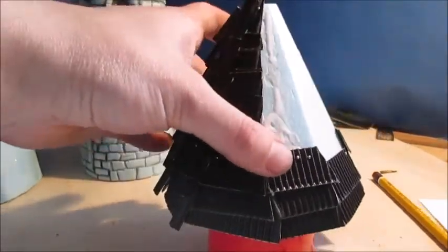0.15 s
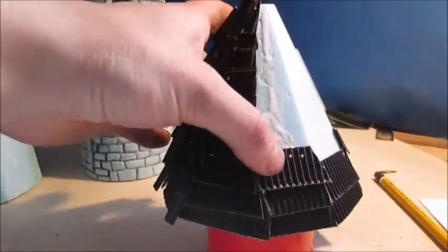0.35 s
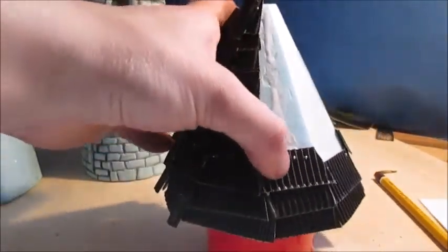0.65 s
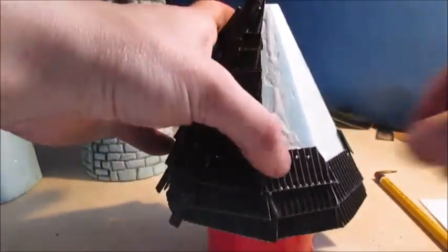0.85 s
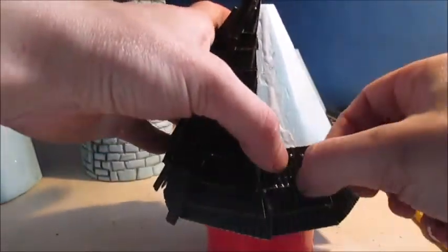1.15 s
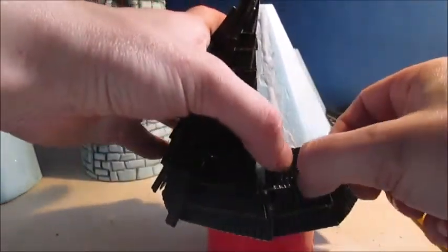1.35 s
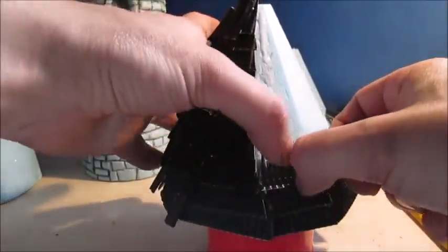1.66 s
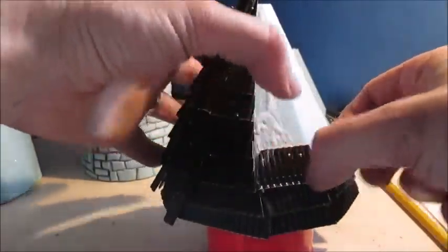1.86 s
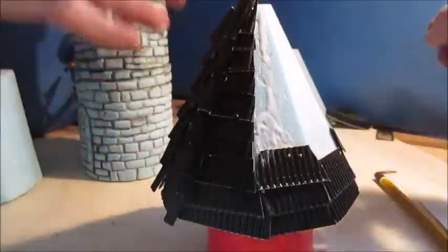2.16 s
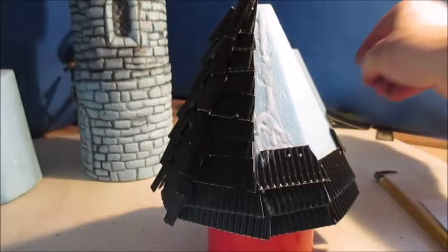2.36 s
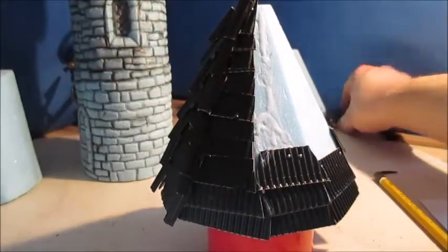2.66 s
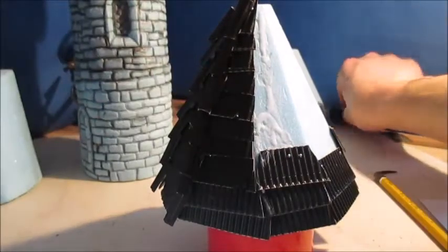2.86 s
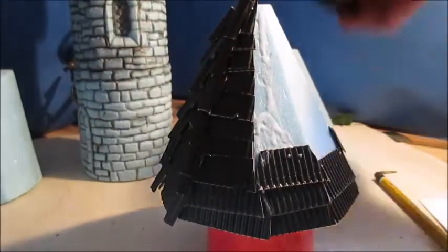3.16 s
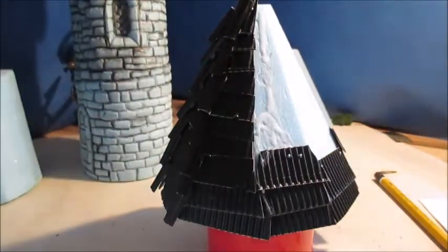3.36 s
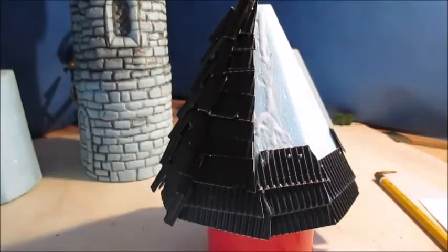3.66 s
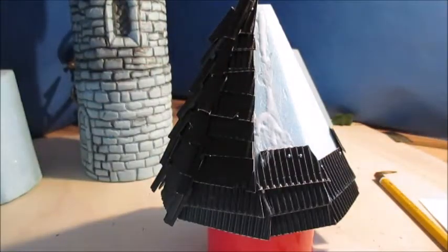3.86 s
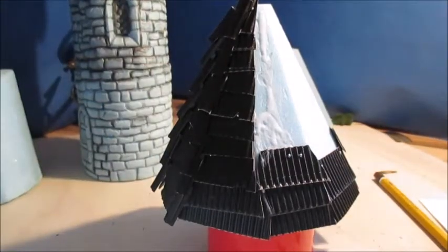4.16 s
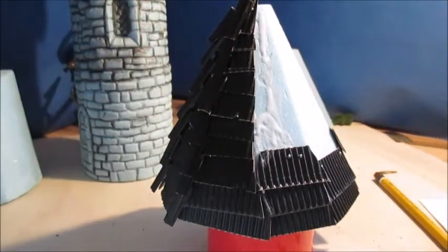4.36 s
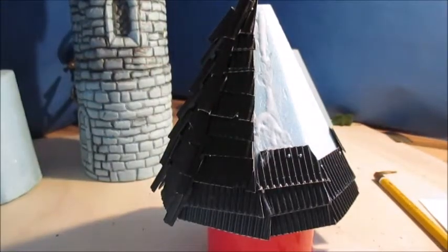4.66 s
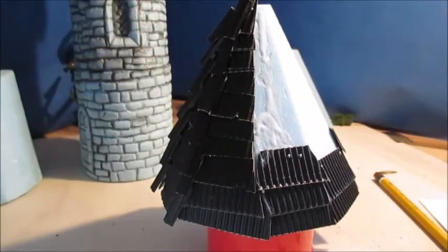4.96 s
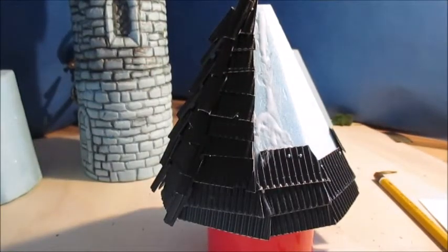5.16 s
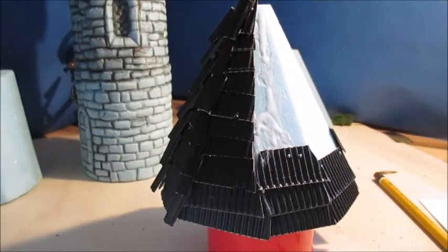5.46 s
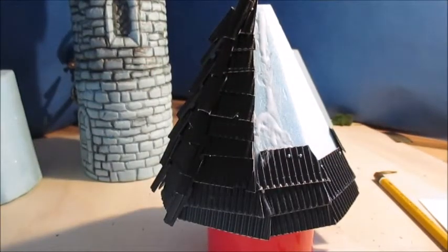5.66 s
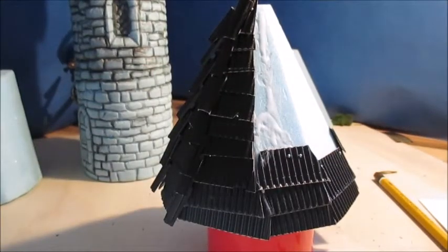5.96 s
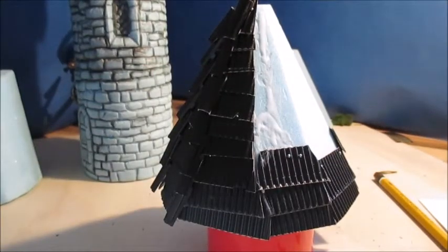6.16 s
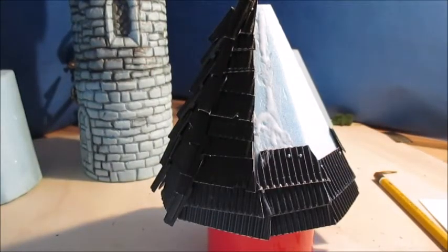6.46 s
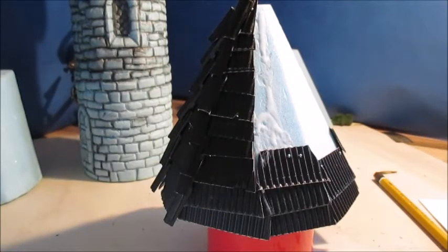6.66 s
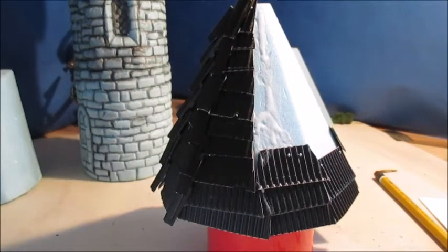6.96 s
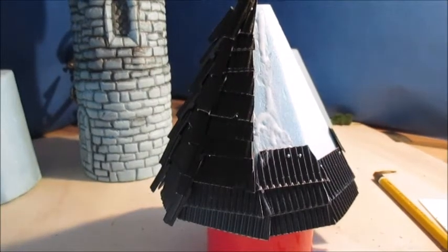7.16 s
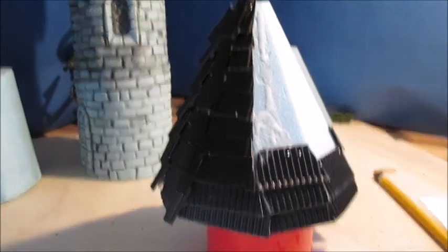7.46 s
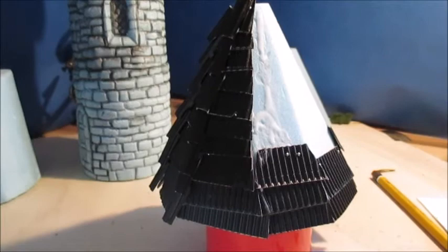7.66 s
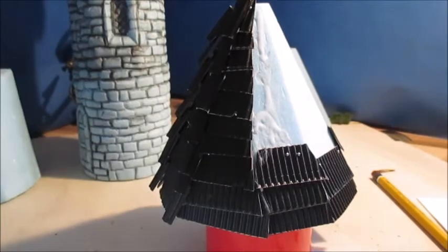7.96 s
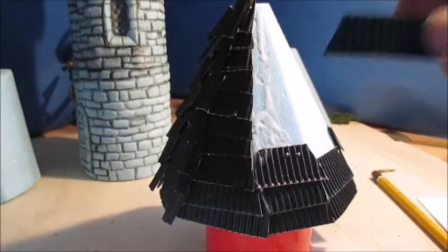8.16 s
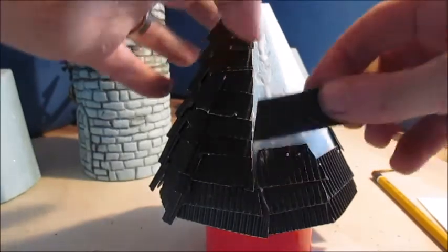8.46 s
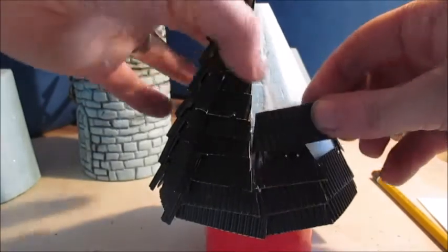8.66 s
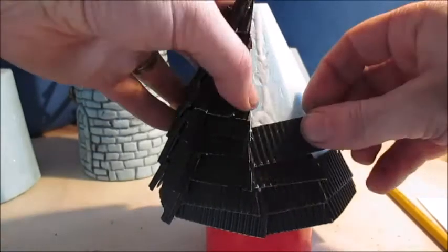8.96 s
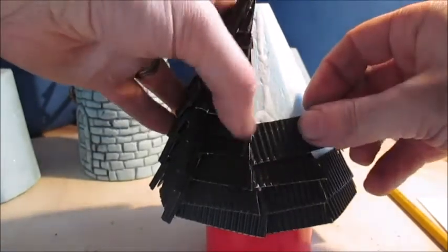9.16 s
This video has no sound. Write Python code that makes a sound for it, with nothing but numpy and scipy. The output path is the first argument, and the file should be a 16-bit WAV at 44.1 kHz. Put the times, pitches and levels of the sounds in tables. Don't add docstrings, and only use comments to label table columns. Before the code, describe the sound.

A small room with low mains hum and soft fan noise throughout, miked close to hands handling ribbed card and foam on a wooden table. From 0 to 1.1 s, taps and short drags, with firm dull knocks around 0.7 s and soft table thuds. Small, faint handling follows until one sharp, cracking low knock at 1.6 s, then near quiet. At 2.5-2.9 s a bout of gritty rubbing and quick knocks. Light brushes and ticks at 3.2-3.7 s, then a hard knock at 4.05 s with scraping to about 5 s. Soft brushing and sparse scuffs until 6.1 s, where a bright snap sounds; crisp snaps cluster at 6.45-6.53 s. Knocking and rubbing at 7.0-7.3 s lead to the loudest clack at 7.45 s with a short room tail. Small bright ticks at 7.9 s, then faint touches and a weak drag from 8.2 to 9.2 s.

```python
import sys
import numpy as np
from scipy import signal
from scipy.fft import rfft, irfft
from scipy.io import wavfile
from scipy.ndimage import uniform_filter1d

SR = 44100
rng = np.random.default_rng(int(sys.argv[2]) if len(sys.argv) > 2 else 0)


def master(y):
    cut = np.clip(np.atleast_2d(y).T, -1, 1)
    pcm = np.round(cut * 32767)
    wavfile.write(sys.argv[1], SR, pcm.astype(np.int16))


def voltage_ratio(decibels):
    exponent = np.asarray(decibels, float) / 20
    return 10 ** exponent


N = 410571


def rms_one(x):
    return x / np.sqrt(np.mean(x ** 2) + 1e-20)


def at_hz(points, hz):
    hz_points, values = np.transpose(points)
    return np.interp(np.log(np.maximum(hz, 1)), np.log(hz_points), values)


def coloured(x, spectrum):
    gain = voltage_ratio(at_hz(spectrum, np.fft.rfftfreq(N, 1 / SR)))
    return rms_one(irfft(rfft(x) * gain, N))


def band(x, low_hz, high_hz):
    return signal.sosfilt(signal.butter(2, [low_hz, high_hz], "band", fs=SR, output="sos"), x)


def drift(rate_hz):
    r = np.exp(-2 * np.pi * rate_hz / SR)
    noise = rng.standard_normal(N + SR)
    return rms_one(signal.lfilter([1], [1, -2 * r, r * r], noise)[SR:])


def contacts(rows, spread, rise, slips_per_s, first_db, cycles):
    ladder, rise = np.linspace(-2, 2, num=30), np.clip(rise, 1e-4, .03)
    out = np.zeros(N + SR)
    for s, peak_db, centre_hz, t60 in rows:
        chance, luck = rng.standard_normal((2, 30)), rng.random((2, SR // 4))
        step = ladder + .025 * chance[0]
        hz = np.minimum(centre_hz * 2 ** (spread * step), .4 * SR)
        weight = np.exp(-step ** 2 / 2.0) * hz ** 0.53 * voltage_ratio(2.4 * chance[1])
        ring_samples = min(1500, int(cycles / hz.min() * SR))
        turns = np.outer(hz, np.arange(ring_samples) / SR)
        rings = np.sin(2 * np.pi * turns) * np.exp(-np.log(1000) / cycles * turns)
        body = np.pad(weight @ rings, (0, 300))

        t60 = np.clip(t60, .004, .3)
        t = np.arange(min(SR // 4, int((rise + 1.2 * t60) * SR))) / SR
        force = np.minimum(t / rise, 1) * voltage_ratio(-60 * np.maximum(t - rise, 0) / t60)
        slips = ((luck[0] < slips_per_s / SR) * (2 * luck[1] - 1))[:len(t)]
        slips[round(rise * SR)] = voltage_ratio(first_db) * np.exp(-rise / 0.0044)
        sound = signal.fftconvolve(slips * force, body)
        sound = band(sound, hz.min(), hz.max())
        at = round(s * SR)
        out[at:at + len(sound)] += voltage_ratio(peak_db + 2.0) * sound / np.abs(sound).max()
    return out[:N]


# start in seconds, peak level in dB, middle pitch in Hz, time to fall 60 dB in seconds.
FIRM_KNOCKS = [(.376, -16.5, 860, 0.082), (.711, -8.5, 970, 0.11), (.817, -27, 900, .04),
               (1.278, -41, 1110, 0.33), (1.58, -35, 786, .016), (2.637, -26, 650, .032),
               (2.797, -16.5, 1230, .047), (2.828, -19, 520, 0.029), (4.033, -13.5, 750, 0.14),
               (4.085, -13.5, 600, 0.035), (4.38, -17, 1730, 0.057), (4.438, -18, 1010, 0.057),
               (6.443, -13, 2440, 0.0078), (6.503, -22, 2000, 0.008), (6.528, -15, 1300, 0.018),
               (7.212, -26, 840, 0.03), (8.222, -37, 755, 0.024), (7.022, -10, 1100, 0.035)]


def firm_knocks():
    return contacts(FIRM_KNOCKS, spread=0.75, rise=0.001226, slips_per_s=2500, first_db=5.5, cycles=14)


# start in seconds, peak level in dB, middle pitch in Hz, time to fall 60 dB in seconds.
HOLLOW_KNOCKS = [
    (.091, -16.5, 1340, 0.037),
    (.415, -21, 570, 0.031),
    (.775, -33, 804, .059),
    (1.59, -8.5, 627, 0.015),
    (6.462, -27, 1380, 0.028),
    (7.442, -1.5, 1360, 0.019),
    (7.476, -8, 1300, 0.03),
    (8.664, -44, 2280, .013),
    (7.463, 2.3, 820, 0.026),
]


def hollow_knocks():
    return contacts(HOLLOW_KNOCKS, spread=0.37, rise=.0014, slips_per_s=2500, first_db=5.5, cycles=14)


# start in seconds, peak level in dB, middle pitch in Hz, time to fall 60 dB in seconds.
GLANCING_KNOCKS = [(.172, -37, 1390, .026), (.33, -25.5, 690, .036), (.619, -23, 960, 0.038),
                   (.749, -10, 950, 0.03), (.903, -31.5, 1110, 0.036), (1.012, -35, 700, 0.12),
                   (2.545, -16, 1230, 0.04), (2.62, -30, 910, 0.029), (2.652, -22, 1100, 0.035),
                   (2.727, -14, 1110, 0.04), (2.765, -18, 1470, 0.095), (3.501, -29.5, 1660, 0.014),
                   (3.72, -29, 1830, 0.0088), (4.063, -2, 1480, 0.025), (4.46, -18, 850, 0.017),
                   (.115, -32.5, 1240, 0.11), (7.055, -19, 1150, 0.064), (7.307, -27, 1380, 0.01),
                   (7.495, -12, 1410, 0.034), (7.876, -29.5, 1290, 0.0056), (8.866, -43, 1250, 0.037)]


def glancing_knocks():
    return contacts(GLANCING_KNOCKS, spread=0.73, rise=0.0053, slips_per_s=2500, first_db=5.5, cycles=14)


# start in seconds, peak level in dB, middle pitch in Hz, time to fall 60 dB in seconds.
SHOVES = [
    (.305, -25.5, 1080, 0.11),
    (.392, -19, 900, 0.03),
    (.742, -23, 1090, 0.048),
    (2.587, -20, 930, 0.058),
    (4.248, -24.5, 1140, 0.13),
    (4.325, -24.5, 1420, 0.052),
    (4.345, -18.5, 597, 0.091),
    (6.892, -32.5, 1100, 0.1),
    (6.998, -28.5, 540, 0.045),
    (7.143, -34.5, 1170, 0.033),
]


def shoves():
    return contacts(SHOVES, spread=0.58, rise=0.0099, slips_per_s=2500, first_db=5.5, cycles=14)


# start in seconds, peak level in dB, middle pitch in Hz, time to fall 60 dB in seconds.
CRACKS = [(.093, -37, 3380, 0.023), (.396, -34.5, 3200, 0.061), (.712, -22, 2600, 0.04),
          (.817, -34, 3150, 0.035), (1.586, -31, 8000, 0.008), (1.591, -5, 4920, 0.012),
          (2.765, -26, 3200, 0.04), (4.0655, -10, 2800, 0.022), (2.785, -30, 6960, 0.025),
          (4.333, -27, 3900, 0.088), (4.44, -33, 4150, 0.23), (6.904, -35.5, 4750, 0.11),
          (7.022, -19.5, 5800, 0.071), (7.053, -26, 7300, 0.02), (7.443, -25, 3000, 0.05),
          (7.463, -12, 4600, 0.06), (7.494, -21, 4000, 0.08), (8.868, -40, 4430, 0.054),
          (8.582, -45, 3800, 0.056), (8.894, -40, 2400, .02)]


def cracks():
    return contacts(CRACKS, spread=0.63, rise=.0008, slips_per_s=6600, first_db=7, cycles=22)


# start in seconds, peak level in dB, middle pitch in Hz, time to fall 60 dB in seconds.
THIN_SNAPS = [(1.342, -41.5, 5100, 0.1), (3.587, -38, 7000, .015), (3.597, -32.5, 4150, 0.014),
              (3.722, -26, 5800, 0.011), (.21, -32, 10100, .12), (6.097, -17, 7700, 0.029),
              (6.443, -12, 7100, 0.017), (6.5035, -14, 7000, 0.005), (6.53, -18, 7900, 0.05),
              (7.877, -18.5, 5700, 0.007), (8.222, -38, 7500, 0.054), (8.788, -36.5, 5600, 0.021),
              (9.19, -35, 5770, .008)]


def thin_snaps():
    return contacts(THIN_SNAPS, spread=0.82, rise=0.0012, slips_per_s=6600, first_db=7, cycles=22)


# start in seconds, peak level in dB, middle pitch in Hz, time to fall 60 dB in seconds.
PINGS = [(.903, -34.5, 8900, 0.019), (6.03, -46, 7150, .03), (6.31, -52, 9600, .02),
         (6.62, -43, 13000, .05), (.712, -26, 6500, 0.1), (.742, -15, 2940, 0.012),
         (4.052, -31, 8000, 0.02), (4.145, -31, 7100, 0.015), (4.248, -31, 8500, .064),
         (4.305, -30, 11500, 0.023), (4.38, -28, 2500, 0.037), (6.461, -21, 7600, 0.012),
         (7.012, -20.5, 6800, 0.23), (7.143, -35, 9500, 0.15), (7.19, -38, 12500, .02),
         (7.306, -36, 9500, .02), (7.871, -33, 8700, .018), (7.877, -17, 9950, 0.0067),
         (8.048, -30.5, 8950, 0.0089)]


def pings():
    return contacts(PINGS, spread=0.21, rise=0.00065, slips_per_s=6600, first_db=7, cycles=22)


# start in seconds, peak level in dB, middle pitch in Hz, time to fall 60 dB in seconds.
SCUFFS = [(.315, -26.5, 4800, 0.017), (.62, -26, 6800, .025), (.758, -31, 5500, 0.012),
          (.993, -42.5, 5400, 0.11), (1.435, -47, 5250, .04), (2.542, -30, 4580, 0.59),
          (2.585, -27.5, 4600, .12), (2.731, -26, 2800, 0.043), (3.499, -29, 7800, 0.015),
          (5.019, -27, 3500, .03), (5.19, -48, 6450, .04), (5.731, -39.5, 5320, .12),
          (6.228, -42, 5260, 0.037), (8.678, -35, 3950, 0.015), (8.685, -30.5, 9400, 0.067)]


def scuffs():
    return contacts(SCUFFS, spread=0.57, rise=.0035, slips_per_s=6600, first_db=7, cycles=22)


# start in seconds, peak level in dB, middle pitch in Hz, time to fall 60 dB in seconds.
BRUSHES = [(2.56, -32, 10000, 0.11), (2.655, -43, 10000, 0.12), (2.85, -40, 8260, 0.081),
           (7.66, -64.5, 9000, .1), (4.27, -35, 11500, 0.11), (.57, -46, 7460, 0.24),
           (3.218, -37, 7500, .18), (3.35, -48, 8500, .06), (3.655, -45, 8500, 0.07),
           (3.52, -46, 8500, 0.11), (4.955, -53, 8500, .1), (5.02, -40, 10000, .15),
           (5.385, -44, 6400, .16), (5.768, -35.5, 4500, 0.066), (6.07, -38.5, 5260, .063),
           (6.105, -37.5, 7050, 0.23), (7.972, -37, 10100, 0.099), (8.143, -35, 8600, 0.018),
           (8.817, -42, 4670, 0.079)]


def brushes():
    return contacts(BRUSHES, spread=0.7, rise=.013, slips_per_s=6600, first_db=7, cycles=22)


# start in seconds, peak level in dB, middle pitch in Hz, time to fall 60 dB in seconds.
RUBS = [(7.207, -18, 950, .06), (7.016, -14, 1000, .03), (7.042, -18, 7500, .07), (7.298, -30, 9500, .04),
        (7.09, -30, 1000, .04), (4.36, -24, 600, .06), (4.1, -20, 800, .06), (4.455, -25, 700, .05),
        (2.732, -13, 1200, .02), (2.576, -30, 8800, .03), (2.595, -33, 7500, .05), (2.855, -36, 4500, .05),
        (6.51, -33, 8000, .06), (.02, -35, 330, .2), (.405, -19, 800, .05), (7.23, -30, 600, .04),
        (7.025, -23, 3600, .12), (7.05, -25, 4200, .07), (2.6, -29, 2600, .1), (2.69, -28, 1500, .08),
        (2.78, -27, 3000, .1), (4.25, -30, 2200, .15), (3.22, -46, 2000, .2), (3.054, -46, 9000, .08),
        (.33, -31, 330, .2), (7.483, -14, 1500, .06), (3.678, -42, 9000, .05)]


def rubs():
    return contacts(RUBS, spread=.4, rise=.006, slips_per_s=4000, first_db=3, cycles=16)


# start in seconds, peak level in dB, middle pitch in Hz, time to fall 60 dB in seconds.
TICKS = [(4.039, -12, 900, .008), (7.448, -8, 1400, .01), (7.2975, -32, 2500, .006),
         (7.311, -27, 2500, .008), (7.238, -35, 2500, .006), (6.5265, -18, 3000, .005),
         (6.5295, -9, 5000, .004), (1.5795, -40, 6000, .006), (2.815, -30, 7500, .01),
         (7.48, -8, 1300, .01), (7.003, -41, 3000, .006), (6.759, -42, 4000, .006), (6.956, -40, 7000, .01),
         (4.118, -30, 9000, .01), (.712, -8, 1500, .004), (.706, -36, 7000, .008), (.903, -36, 3500, .01),
         (3.748, -40, 2500, .006), (8.049, -38, 5000, .005), (3.587, -40, 2500, .006)]


def ticks():
    return contacts(TICKS, spread=.7, rise=.0005, slips_per_s=2500, first_db=9, cycles=10)


# start in seconds, peak level in dB, middle pitch in Hz, time to fall 60 dB in seconds.
RINGS = [(1.592, -21, 605, .015), (1.591, -17, 8800, .012), (1.591, -24, 4150, .008),
         (4.145, -32, 7500, .08), (4.248, -28, 8600, .03), (4.38, -29, 4700, .05), (4.438, -33, 4700, .12),
         (7.463, -20, 9700, .015), (2.766, -24, 4100, .02), (6.529, -28, 680, .015),
         (4.052, -30, 10500, .03), (.625, -33, 6300, .05), (.677, -40, 7400, .006),
         (3.228, -42, 10500, .05), (3.503, -34, 8700, .04)]


def rings_left():
    return contacts(RINGS, spread=.08, rise=.0007, slips_per_s=4000, first_db=7, cycles=28)


def bounce(x):
    start_s, end_s, share, late_samples = 6.4, 7.35, .35, 5
    t = np.arange(N) / SR
    close = (t > start_s) * (t < end_s)
    return x + close * share * (np.roll(x, late_samples) - x) / (1 + share)


def ring(clicks, hz, t60):
    r, w = voltage_ratio(-60 / (t60 * SR)), 2 * np.pi * hz / SR
    return signal.lfilter([0, np.sin(w)], [1, -2 * r * np.cos(w), r * r], clicks + 1e-18)


# pitch in Hz, level in dB, time to fall 60 dB in seconds.
TABLE_MODES = [(63.2, -15, 0.085), (84, 3.5, 0.2), (127.7, 5.5, 0.14), (223.7, 2, 0.25), (246.3, 1, 0.16)]


def table(pushes):
    return sum(voltage_ratio(db) * ring(pushes, hz, t60) for hz, db, t60 in TABLE_MODES)


# start in seconds, peak level in dB, pitch in Hz, time to fall 60 dB in seconds.
THUDS = [(0.091, -30, 196, 0.069), (0.318, -28.5, 90, 0.13), (0.39, -31, 86, 0.21), (0.64, -30, 99, 0.25),
         (0.697, -26, 79, 0.11), (0.757, -17.5, 213, 0.092), (2.549, -33.5, 121, 0.34),
         (2.6, -37.5, 246, 0.12), (2.728, -28.5, 249, 0.33), (3.462, -41, 125, 0.1),
         (3.706, -36, 102, 0.11), (4.035, -26, 81.3, 0.083), (4.065, -17.5, 79, 0.2),
         (4.346, -27.5, 64.3, 0.28), (4.435, -26, 76, 0.12), (6.441, -32, 326, 0.06),
         (6.526, -40, 382, 0.093), (6.888, -38, 45.8, 0.43), (7.042, -28.5, 55, 0.6),
         (7.061, -25, 122, 0.12), (7.234, -31, 107, 0.2), (7.532, -29.5, 74.5, 0.18),
         (7.461, -16.5, 142.6, 0.32), (7.861, -40.5, 136, 0.27), (8.686, -45.5, 97, 0.3)]


def thuds():
    t, out, pushes = np.arange(SR // 4) / SR, np.zeros(N), np.zeros(N)
    for s, peak_db, hz, t60 in THUDS:
        at = round(s * SR)
        swell = (1 - np.exp(-t / .004)) * voltage_ratio(-60 * t / t60)
        out[at:at + len(t)] += voltage_ratio(peak_db) * swell * np.sin(2 * np.pi * hz * t)
        pushes[at] = voltage_ratio(peak_db - 12.5)
    return out + table(pushes)


def grains(per_s, spread_db):
    sizes = voltage_ratio(spread_db * np.minimum(rng.exponential(1, N), 5)) * rng.choice([-1, 1], N)
    chance = per_s * voltage_ratio(4 * drift(25)) / SR
    return sizes * (rng.random(N) < chance)


# start in seconds, hold in seconds, card level in dB,
# bright rustle in dB above the card, table rumble in dB above the card.
STROKES = [(0.0, 0.36, -51, -8, -9), (0.399, 0.022, -55, -10, 24), (0.53, 0.57, -54, -9, 5.5),
           (2.59, 0.12, -33, -17, -8), (2.746, 0.094, -32.5, -15.5, -6.5), (3.414, 0.49, -56.5, -21, 2.5),
           (4.061, 0.069, -33.5, -10, 4.5), (4.163, 0.29, -40, -11, -19), (4.46, 0.528, -50, -13, -1.5),
           (6.891, 0.051, -44.5, -9, -1.5), (7.097, 0.21, -46, -10.5, -7.5), (7.424, 0.081, -27, -26, -34),
           (8.676, 0.17, -60, -3, -8)]
# pitch in Hz, level in dB per Hz.
SLIP = [(200, 5), (350, 9.5), (600, 2.5), (1100, -2), (1800, -3), (2800, -8), (4500, -25), (10000, -57)]
# pitch in Hz, level in dB per Hz.
RUSTLE = [(900, -40.5), (2000, -26), (3500, -3), (6000, -4), (9000, -5), (12000, -14.5), (16000, -23)]


def drags():
    rise_db_per_s, fall_db_per_s = 488, 235
    t, levels = np.arange(N) / SR, np.zeros((3, N))
    for s, hold, card_db, rustle_db, rumble_db in STROKES:
        before, after = np.maximum(s - t, 0), np.maximum(t - s - hold, 0)
        lost_db = rise_db_per_s * before + fall_db_per_s * after
        layers_db = np.array([0, rustle_db, rumble_db]) + card_db
        levels += np.outer(voltage_ratio(layers_db), voltage_ratio(-lost_db))
    card = coloured(grains(2500, 3), SLIP)
    rustle = coloured(grains(6000, 2.8), RUSTLE)
    rumble = rms_one(table(rng.standard_normal(N)))
    return levels[0] * card + levels[1] * rustle + levels[2] * rumble


# pitch in Hz, time to fall 60 dB in seconds.
ROOM_T60 = [(150, 0.29), (1000, 0.2), (4000, 0.13), (12000, 0.098)]


def room():
    t = np.arange(SR // 2) / SR
    edges = 80 * 2. ** np.arange(9)
    tail = np.zeros(len(t))
    for low, high in zip(edges, edges[1:]):
        decay = voltage_ratio(-60 * t / at_hz(ROOM_T60, 1.4 * low))
        tail += band(rng.standard_normal(len(t)), low, high) * decay
    spectrum = rfft(tail)
    even = spectrum / np.sqrt(uniform_filter1d(np.abs(spectrum) ** 2, size=100))
    bass_loss = np.minimum(np.fft.rfftfreq(len(t), 1 / SR) / 1100, 1)
    tail = irfft(even * bass_loss, len(t)) * (t < .4)
    tail = tail * np.clip(t / 0.0011, 0, 1)
    return voltage_ratio(-4) * tail / np.sqrt(np.sum(tail ** 2))


# pitch in Hz, level in dB per Hz.
FAN = [(90, -53), (150, -16), (260, -2), (400, -7), (800, -7.5), (1500, -15), (2600, -17.5), (3150, -16),
       (3700, -22.5), (7500, -25), (10000, -27.5), (15000, -36.5), (16500, -49.5)]


def background():
    hum_hz, hum_db, flutter_db = 120.0, -54, .4
    rumble_db, fan_db = -55.5, -54.5
    hum_level = np.sqrt(2) * voltage_ratio(hum_db + flutter_db * drift(17))
    hum = hum_level * np.sin(2 * np.pi * hum_hz * np.arange(N) / SR)
    rumble = voltage_ratio(rumble_db) * rms_one(band(rng.standard_normal(N), 22, 171))
    fan = voltage_ratio(fan_db + 1.0 * drift(0.69)) * coloured(rng.standard_normal(N), FAN)
    return hum + rumble + fan


def scene():
    knocks = firm_knocks() + hollow_knocks() + glancing_knocks() + shoves()
    snaps = cracks() + thin_snaps() + pings() + scuffs() + brushes()
    details = rubs() + ticks() + rings_left()
    hands = bounce(knocks + snaps + details)
    echoes = signal.fftconvolve(hands, room())[:N]
    work = hands + echoes + thuds() + drags()
    low_cut = signal.butter(2, 48, "high", fs=SR, output="sos")
    return (signal.sosfilt(low_cut, work) + background())[None]


# middle in seconds, lowest lost pitch in Hz, share lost from 0 to 1.
DROPOUTS = [(.02, 2800, .8), (.15, 2200, .8), (.873, 2500, .9), (1.022, 2500, .8), (1.213, 3000, .7),
            (1.96, 3200, .9), (2.003, 2500, .95), (2.131, 1500, .9), (2.195, 2500, .8), (3.478, 2500, .85),
            (3.58, 3000, .7), (4.222, 1500, .9), (4.605, 1500, .9), (5.28, 1100, 1), (5.65, 1500, .7),
            (5.993, 2500, .8), (6.845, 1500, .8), (8.0, 1200, .6), (8.095, 3500, 1), (8.275, 3000, .8),
            (8.7, 1000, .85)]


def treble_dropouts(x):
    out, fade = x.copy(), signal.windows.tukey(1500, .7)
    t = np.arange(len(fade)) / SR
    for s, edge_hz, share in DROPOUTS:
        at = max(round(s * SR) - 750, 0)
        high_pass = signal.butter(6, edge_hz, "high", fs=SR, output="sos")
        treble = signal.sosfiltfilt(high_pass, x[at:at + len(fade)])
        hz = edge_hz * 2 ** rng.uniform(-.2, 1.9, size=(4, 1))
        kept = .4 * treble.std() * np.sin(2 * np.pi * hz * t).sum(axis=0)
        out[at:at + len(fade)] -= fade * (share * treble - kept)
    return out


def band_limit(x):
    return signal.sosfilt(signal.butter(12, 16830, fs=SR, output="sos"), x)


def record(dry):
    level_db = 10 * np.log10(uniform_filter1d(dry[0] ** 2, size=441) + 1e-12)
    creep_db = 3.2 * np.arange(N) / SR
    wanted_db = 0.26 * np.maximum(level_db + 24.0, 0)
    held_db = np.maximum.accumulate(wanted_db + creep_db) - creep_db
    duck_db = signal.lfilter([.001], [1, -.999], held_db)
    clipped = np.clip(dry[0] * voltage_ratio(-duck_db), -1, 1)
    top_cut = signal.cheby2(12, 40, 16100, fs=SR, output="sos")
    mix = treble_dropouts(signal.sosfilt(top_cut, clipped))[None]
    return band_limit(mix)


dry = scene()
out = record(dry)
master(out)
```